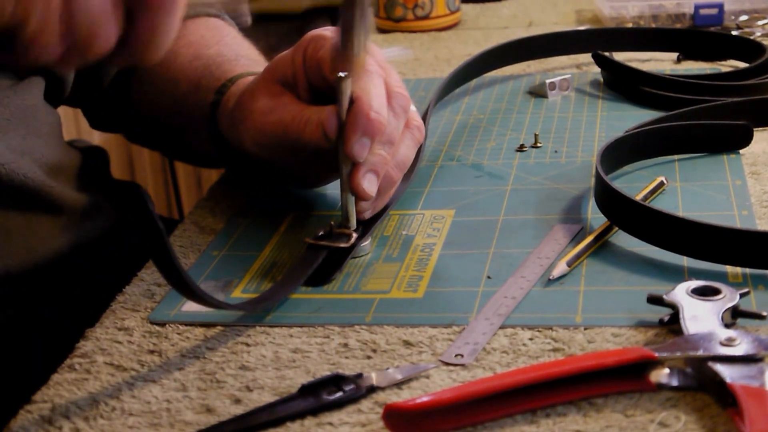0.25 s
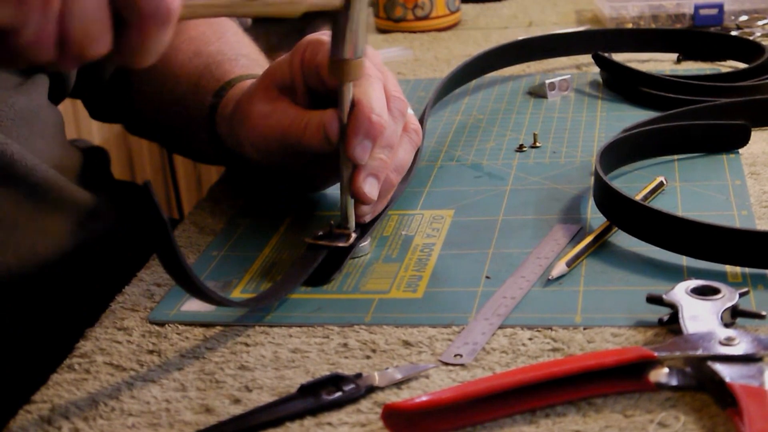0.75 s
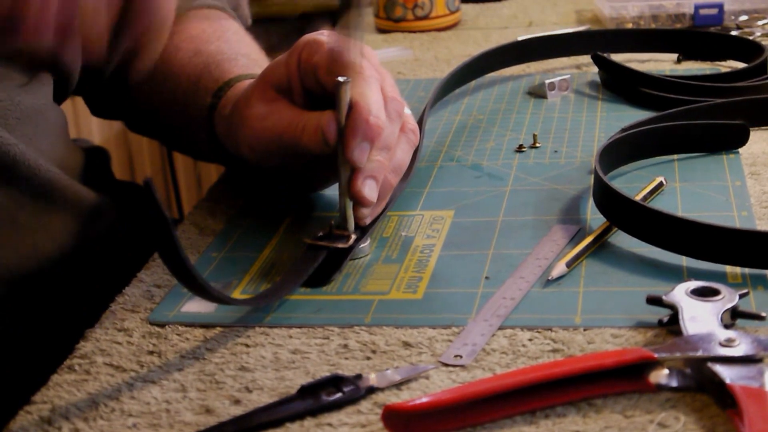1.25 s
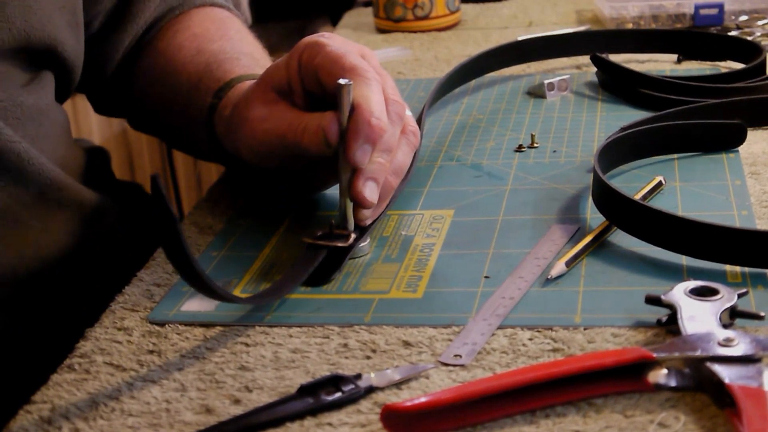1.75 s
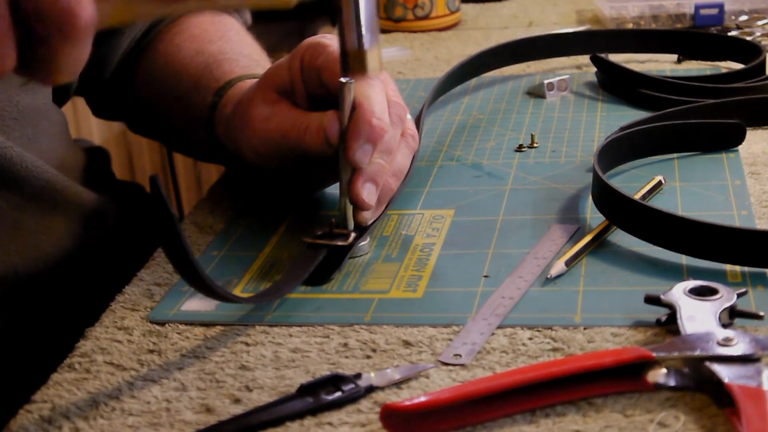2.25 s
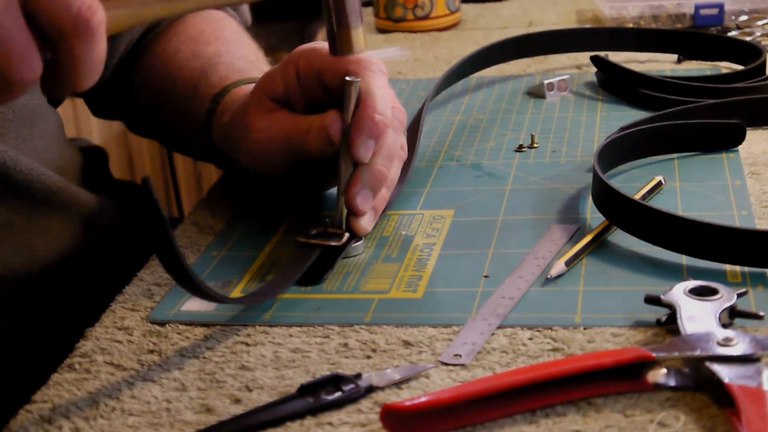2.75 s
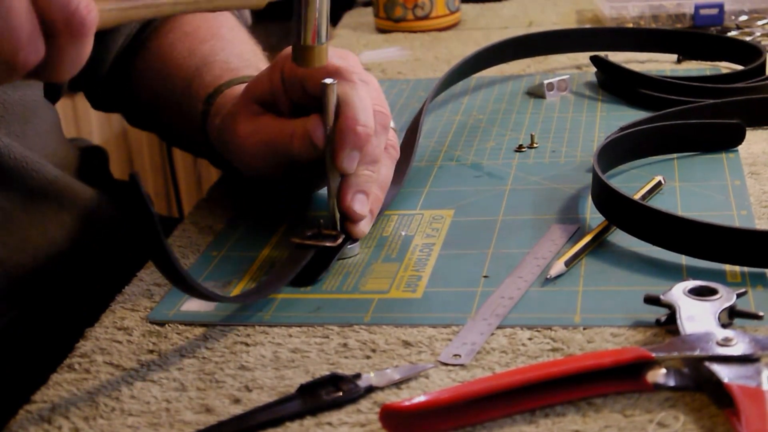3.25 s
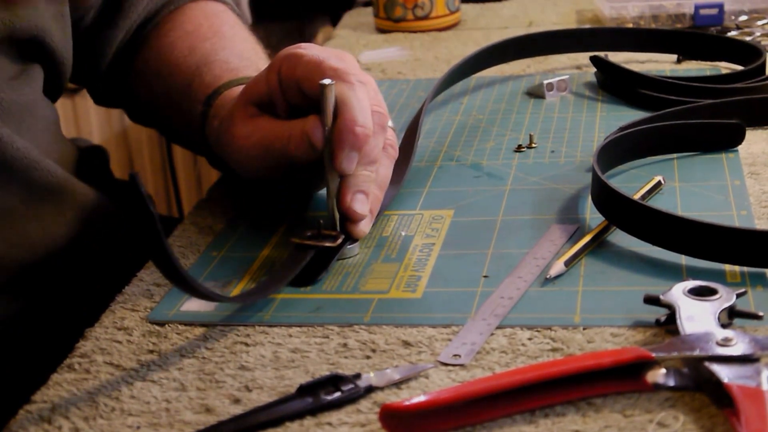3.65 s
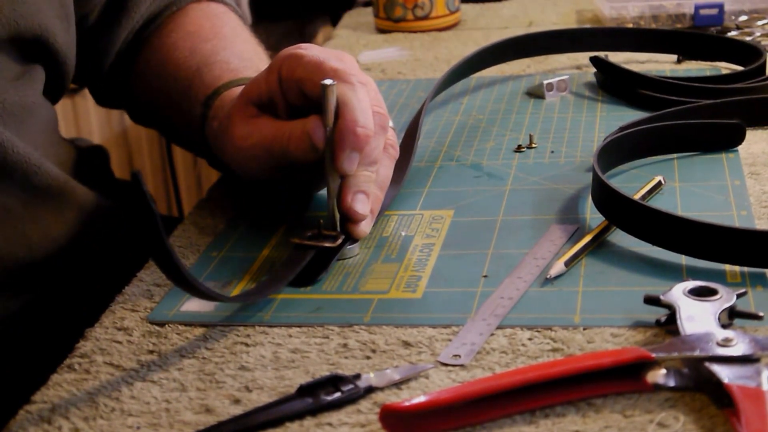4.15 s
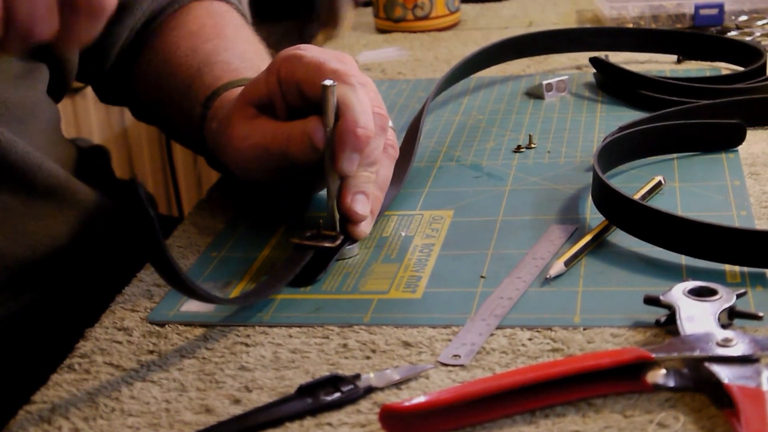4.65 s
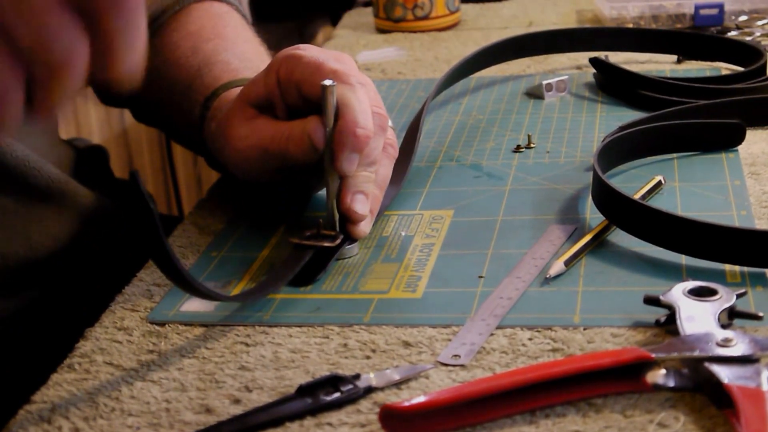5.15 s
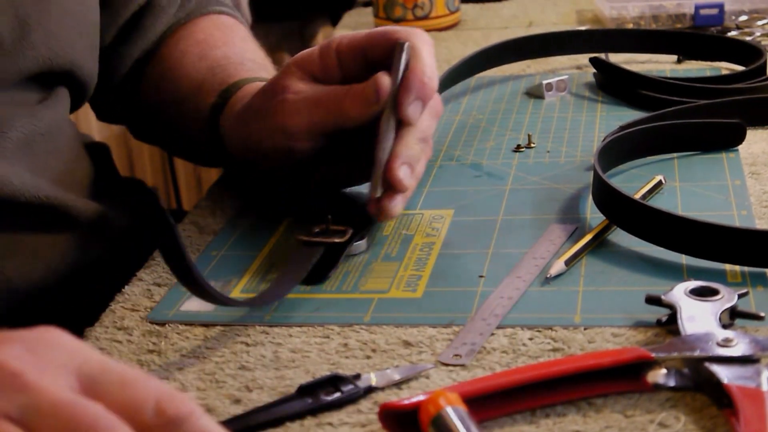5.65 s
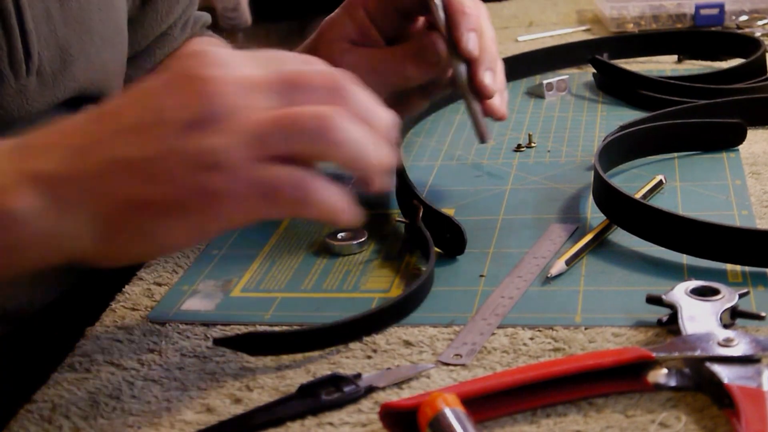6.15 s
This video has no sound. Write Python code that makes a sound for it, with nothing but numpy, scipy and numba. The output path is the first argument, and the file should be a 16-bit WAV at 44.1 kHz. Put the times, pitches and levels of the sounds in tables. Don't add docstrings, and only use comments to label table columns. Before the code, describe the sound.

A small hammer taps a steel rod in two runs of hard, ringing metallic knocks, then is set down with a leathery scrape and clatter.

```python
import sys
import numpy as np
from scipy import signal
from scipy.fft import rfft, irfft
from scipy.io import wavfile
from numba import njit

SR = 44100
rng = np.random.default_rng(int(sys.argv[2]) if len(sys.argv) > 2 else 0)


def boost(x):
    u = np.asarray(x, float) / 20
    return 10 ** u


def materialize(psi):
    bounded = np.clip(np.atleast_2d(psi).T, -1, 1)
    quanta = np.round(bounded * 32767).astype(np.int16)
    wavfile.write(sys.argv[1], SR, quanta)


N = 282240
SCATTER_DB, DETUNE = 1.3, 0.005
HISS_TOP_HZ = 8150


def add(out, s, x):
    i = int(s * SR)
    out[..., i:i + x.shape[-1]] += x[..., :N - i]


def ring(modes, seconds, push_s):
    hz, db, t60 = np.transpose(modes)[:, :, None]
    t = np.arange(int(seconds * SR)) / SR
    sign = (-1) ** np.arange(len(hz))[:, None]
    free = np.sum(sign * boost(db - 60 * t / t60) * np.sin(2 * np.pi * hz * t), axis=0)
    push = np.hanning(int(push_s * SR) + 3)
    return np.convolve(free, push / push.sum())[:len(t)]


def band(hz, ratio, size):
    sos = signal.butter(2, [hz / ratio, hz * ratio], "band", fs=SR, output="sos")
    x = signal.sosfilt(sos, rng.standard_normal((2, size)))
    return x / x.std()


def pair(mid_side, side_db):
    return mid_side[0] + boost(side_db) * mid_side[1] * np.array([[1], [-1]])


def tails(table, build_s, side_db, size):
    t = np.arange(size) / SR
    luck_db = 0.8 * rng.standard_normal(len(table))
    out = np.zeros((2, size))
    for (hz, db, t60, ratio), extra_db in zip(table, luck_db):
        envelope = boost(db + extra_db - 60 * t / t60) * (1 - np.exp(-t / build_s))
        noise = band(hz, max(ratio, 1.001), size)
        out += envelope * pair(noise, side_db + 0.001 * hz)
    return out


# t/s, strength/dB, crack level/dB, damping by the grip [1], rivet stage [0 loose - 4 firm]
BLOWS = [(0.1352, -3.5, -4, 1.6, -1), (.347, 1, -3.5, 1.4, 1.03), (0.5547, 2, -4.5, 1.4, 1.73),
         (0.7964, 3, -0.5, 1.5, 2), (1.0473, 4, -3, 1.2, 3), (1.316, 3, -1.5, 1.1, 3.5),
         (1.587, 3, 0, 1, 3.5), (1.854, 2.5, -1.5, 1.02, 3.5), (3.584, 1.5, -0.5, 1.1, 3),
         (3.9316, 2, -2.5, 1.1, 4.5), (4.275, 2.5, -5.5, 1.1, 4.5), (4.6228, 2.5, 0, 1.3, 4.5),
         (4.972, 2.5, -3, 1.1, 4)]


def hammer():
    out = np.zeros((2, N))
    for s, blow_db, crack_db, damp, stage in BLOWS:
        parts = (
            (-3, ring(rod_modes(stage, damp), 0.2, 0.00005)),
            (crack_db + 2.5, crack()),
            (4 * stage, seated_rivet()),
            (min(-3.5 + stage, -0.1), table_thud()),
            (-24, camera_shake()),
            (0, echoes()),
            (-3.5 * stage, rod_song()),
            (-0.5 * stage, table_rings()),
            (1.9 * stage, jars()),
            (0, buzz()),
            (3 * (stage - 5), hum()),
        )
        for db, part in parts:
            add(out, s, boost(blow_db + db) * part)
    return out


# f/Hz, width/Hz, level/dB
LOOSE_MODES = [(174, 25, 2), (300, 45, -12), (765, 70, 0), (1010, 90, -3), (1225, 73, -2), (1720, 70, -14),
               (2740, 70, -8), (3370, 60, -11), (4320, 65, -14), (4830, 50, -16), (5230, 60, -8),
               (5520, 66, -10), (5970, 70, -10), (6950, 100, -13)]
ROD_HZ = [345, 176, 772, 1110, 1230, 1525, 1800, 2180, 2680, 2920, 3230, 3830, 5200, 7200]
# width/Hz, level/dB when biting, level/dB when rolling, level/dB when firm
ROD_BALANCE = [(49.4, -8.5, -5.5, -17), (27, -5, -8.5, -16.5), (44, -4, -8, 5.5), (47, -10, -22, -2),
               (70, -1, -4.5, -24.5), (78.95, -3, -1.5, -21.5), (60, -23, -17.5, -16), (63, -12.5, 2, -9),
               (60, -21.5, -3, -10.5), (68.5, -21.5, -15.5, -10.5), (80, -14.5, -10.5, -7.5),
               (61, -22, -13, -4), (70, -5.5, -9.5, -19.5), (150, -16, -17.5, -24.5)]


def rod_modes(stage, damp):
    peaks = LOOSE_MODES
    if stage >= 0.5:
        peaks = [(hz, width, np.interp(stage, (1, 2, 4), db)) for hz, (width, *db) in zip(ROD_HZ, ROD_BALANCE)]
    modes = []
    for hz, width, db in peaks:
        detune, scatter = rng.standard_normal(2)
        level_db = db + SCATTER_DB * scatter + 20 * np.log10(width / 60)
        modes.append((hz * (1 + DETUNE * detune), level_db, 2.2 / (width * damp)))
    return modes


def crack():
    t = np.arange(400) / SR
    return boost(-60 * t / 0.0067) * pair(band(3700, 1.8, len(t)), -18)


def seated_rivet():
    return ring([(550, -31, 0.085), (1640, -35, 0.0053)], 0.1, 0.0001)


# f/Hz, level/dB, t60/s
THUD = [(44.73, -25.5, 0.0067), (69.4, -26.5, 0.088), (100, -13, 0.051), (168, -16, 0.045),
        (366, -12.5, 0.041), (510, -22.5, 0.042)]


def table_thud():
    return ring(THUD, 0.21, 0.00015)


def camera_shake():
    modes = [(38, 0, 0.039), (65, -3, 0.08), (150, -5, 0.08)]
    return ring(modes, 0.22, 0.0027) * np.array([[1], [0.2]])


# f/Hz, level/dB, t60/s, half width [frequency ratio]
ECHOES = [(190, -28, 0.2, 1.9), (378, -16, 0.04, 1.4), (703, -19, 0.11, 1.1), (1126, -21.5, .12, 1.25),
          (1900, -24.5, .13, 1.1), (2670, -19, 0.11, 1.2), (3900, -28.5, 0.15, 1.2),
          (5300, -27, 0.056, 0.42), (7050, -34.5, 0.11, 1.1)]


def echoes():
    return tails(ECHOES, 0.003, -35.5, size=9000)


# f/Hz, level/dB, t60/s, half width [frequency ratio]
ROD_SONG = [(5250, -26, .12, 1.05), (8000, -36, .12, 1.04), (2600, -33, .14, 1.09)]


def rod_song():
    return tails(ROD_SONG, 0.0015, -19.5, size=6000)


def settling():
    t = np.arange(SR // 2) / SR
    stop_db = -9 / (1 + np.exp((0.3 - t) / 0.01))
    return boost(stop_db - 60 * (2 * t) ** 6)


RING_HZ = [98, 109, 128, 170, 182, 222, 288, 302, 358, 468]
# level/dB, t60/s
RING_DECAY = [(-45, .7), (-41, 0.8), (-41, .7), (-38, 1.1), (-47, 1.1), (-49, 1.3), (-50, 0.8), (-50, 1.4),
              (-56, 1.1), (-58, .7)]


def table_rings():
    modes = []
    for hz, (db, t60) in zip(RING_HZ, RING_DECAY):
        scatter, detune = rng.standard_normal(2)
        modes.append((hz * (1 + DETUNE * detune), db + SCATTER_DB * scatter, t60))
    return settling() * ring(modes, 0.5, 0.0002)


# f/Hz, level/dB, t60/s
JARS = [(733, -48, 0.32), (1082, -58, .35), (1325, -71, 2.4)]


def jars():
    return ring(JARS, 0.79, 0.00005)


# f/Hz, level/dB, t60/s, half width [frequency ratio]
BUZZ = [(55, -47, .7, 1.4), (130, -50, .8, 1.4), (280, -55, .8, 1.4), (700, -57, .6, 1.25),
        (2450, -60, .9, 1.03)]


def buzz():
    return settling() * tails(BUZZ, 0.011, -27, size=SR // 2)


# f/Hz, level/dB, t60/s, half width [frequency ratio]
HUM = [(3850, -62, 1.5, 1.025), (4300, -59, 1.5, 1.06)]


def hum():
    return settling() * tails(HUM, 0.011, -27.5, size=SR // 2)


def handling():
    out = bumps() + ticks() + sliding_strap() + squeaks()
    return signal.sosfilt(signal.butter(6, HISS_TOP_HZ - 500, fs=SR, output="sos"), out)


# t/s, peak level/dB, f/Hz, t60/s
BUMPS = [(2.402, -54, 150, 0.2), (2.534, -41.5, 170, 0.039), (2.956, -41, 184, 0.057),
         (2.956, -47, 336, 0.11), (2.148, -52.5, 100, 0.39), (2.28, -53, 108, 0.38),
         (2.957, -40.5, 756, 0.045), (3.091, -50, 121, 0.054), (5.552, -32.5, 136, 0.14),
         (5.56, -42, 694, 0.048), (5.57, -34, 150, 0.079), (5.61, -37, 168, 0.074),
         (5.641, -40, 133, 0.061), (5.892, -29.5, 137.5, 0.13), (5.92, -49, 150.3, 0.37),
         (5.95, -41, 131, 0.073)]


def bumps():
    out = np.zeros((2, N))
    for s, db, hz, t60 in BUMPS:
        modes = [(hz, db, t60), (1.3 * hz, db - 9, 1.54 * t60), (2 * hz, db - 12.5, 0.47 * t60)]
        add(out, s, ring(modes, 0.2, 0.00103))
    return out


# t/s, peak level/dB, f/Hz, t60/s, click level/dB
TICKS = [(2.537, -50, 1190, 0.026, -1.5), (3.097, -49, 586, 0.046, -1), (5.578, -46, 3030, 0.0082, 7),
         (5.765, -50, 807, 0.072, -15), (5.78, -42, 1900, 0.023, -10), (5.801, -27.5, 690, 0.059, 17),
         (5.815, -33.5, 640, 0.03, -10), (5.837, -43, 1320, .03, 0), (5.84, -38, 1370, 0.064, -10),
         (5.866, -42.5, 1305, 0.097, 11), (5.886, -28, 774, 0.065, -17), (5.91, -35.5, 800, 0.067, -10),
         (5.968, -27, 826, 0.032, 15), (5.986, -35, 805, 0.049, 5), (6.057, -38.5, 795, 0.045, -8)]


def ticks():
    out = np.zeros((2, N))
    t = np.arange(2000) / SR
    for s, db, hz, t60, click_db in TICKS:
        modes = [(hz, db, 0.58 * t60), (1.6 * hz, db - 3.5, 0.15 * t60), (2.56 * hz, db - 9.5, 0.49 * t60)]
        add(out, s, ring(modes, 0.1, 0.0001))
        click = pair(band(2360, 1.6, len(t)), -40)
        add(out, s, boost(db + click_db - 26.5 - 60 * t / 0.031) * click)
        rattle = pair(band(1.3 * hz, 1.76, len(t)), -34)
        add(out, s, boost(db - 13.5 - 60 * t / (2.8 * t60)) * rattle)
    return out


# t/s, level/dB
SLIDE = [
    (5.7, -54.5),
    (5.81, -39),
    (5.85, -42),
    (5.87, -27),
    (5.885, -39),
    (5.982, -35.5),
    (6.0, -40),
    (6.05, -58),
    (6.199, -67),
]


def sliding_strap():
    out = np.zeros((2, N))
    s, slide_db = np.transpose(SLIDE)
    size = SR // 2
    t = s[0] + np.arange(size) / SR
    grains = boost(2.1 * rng.exponential(size=size))
    scrape = band(790, 1.13, size)
    scrape = scrape + boost(-7.5) * band(1700, 2.5, size)
    scrape = scrape + boost(-13) * band(4000, 1.9, size)
    add(out, s[0], boost(np.interp(t, s, slide_db) - 20.5) * grains * pair(scrape, -23))
    return out


# t/s, level/dB, f/Hz, length/s
SQUEAKS = [
    (2.0, -64, 5300, 0.025),
    (2.175, -63, 5300, 0.063),
    (2.212, -62, 5600, 0.039),
]


def squeaks():
    out = np.zeros((2, N))
    for s, db, hz, length_s in SQUEAKS:
        size = int(length_s * SR)
        noise = pair(band(hz, 1.015, size=4000), -18)[:, :size]
        add(out, s, boost(db) * np.hanning(size) * noise)
    return out


def dip(t, back_s):
    since = t - np.array(BLOWS)[:, :1]
    return np.tanh(np.sum((since > 0) * np.exp(-np.abs(since) / back_s), axis=0))


# f/Hz, level/dB
HISS = [(15, -7), (40, 3), (70, 1.5), (110, 1.5), (170, -6.5), (300, -9.5), (600, -7.5), (1300, -12),
        (2500, -6.5), (3300, -10), (4500, -16.5), (6300, -20), (8300, -27), (11000, -58.5)]
# f/Hz, side minus mid level/dB
HISS_SIDE = [(60, -9), (110, -3), (200, -10.5), (380, -12.5), (700, -20), (1290, -19), (2380, -30.5),
             (4400, -19.5), (8120, -3), (15000, 3)]
# t/s, level/dB
HISS_DRIFT = [
    (0, 2),
    (2.0, -1.2),
    (3.5, 0.37),
    (5.0, -2.5),
    (5.4, -5),
    (5.7, -1.7),
    (6.4, -.3),
]
# f/Hz, level/dB, half width [frequency ratio]
WHINE = [(2417, -22, 1.006), (2490, -19, 1.008), (2832, -22, 1.004), (3101, -28, 1.001), (6202, -31, 1.001)]


def hiss():
    t = np.arange(N) / SR
    hz = np.maximum(np.arange(N // 2 + 1) * SR / N, 1)
    curves = []
    for table in (HISS, HISS_SIDE):
        table_hz, table_db = np.transpose(table)
        curves.append(np.interp(np.log(hz), np.log(table_hz), table_db))
    colour, side = curves
    spectrum = rfft(rng.standard_normal((2, N))) * boost([colour, colour + side])
    spectrum = spectrum / (1 + (hz / HISS_TOP_HZ) ** 40)
    spectrum = spectrum / irfft(spectrum[0], N).std()

    blows = np.array([-9] + [row[0] for row in BLOWS])
    since = t - blows[np.searchsorted(blows, t) - 1]
    duck = np.exp(-(since / 0.3) ** 2)
    bite = np.minimum(0.3 + t / 1.1, 1)
    bass = 1 / (1 + (hz / 300) ** 4)
    treble = 1 / (1 + (4700 / hz) ** 16)
    parts = ((bass, -0.74), (1 - bass - treble, 0), (treble, -8.5 * duck * bite))
    out = sum(boost(db) * pair(irfft(spectrum * part, N), 0) for part, db in parts)

    whine_duck_db = -9 * duck
    for line_hz, db, ratio in WHINE:
        out = out + boost(db + whine_duck_db) * band(line_hz, ratio, N)[0]
    out = out + boost(-8.5 + whine_duck_db) * np.sin(2 * np.pi * 3101 * t)

    drift_db = np.interp(t, *np.transpose(HISS_DRIFT))
    level_db = -55.5 + drift_db + 1 * dip(t, 0.2) - 3.5 * dip(t, 2.2)
    pan_db = -1.7 * np.array([[0.5], [-0.5]])
    return out * boost(level_db + 3 + pan_db)


def scene():
    return hammer() + handling() + hiss()


def smear():
    out = np.zeros((2, N))
    block_s, block_start_s, lead_min_s = 1024 / SR, 0.0192, 0.0185
    for s, *_ in BLOWS:
        lead_s = lead_min_s + (s - lead_min_s - block_start_s) % block_s
        db = -44 - 380 * (lead_s - lead_min_s)
        t = np.arange(int((lead_s + 0.015) * SR)) / SR
        tilt = 0.5 - t / lead_s
        noise = boost(-8 * tilt) * band(1400, 4.5, size=2600)[:, :len(t)]
        noise = noise + boost(-2.5 - 3.5 * tilt) * band(5200, 1.7, size=2600)[:, :len(t)]
        add(out, s - lead_s, boost(db) * signal.windows.tukey(len(t), 0.3) * pair(noise, -10))
    return out


@njit
def follow(x, attack, release):
    y, e = np.empty(len(x)), 0.
    for i in range(len(x)):
        e += (x[i] - e) * (attack if x[i] > e else release)
        y[i] = e
    return y


def roll_off(x):
    return signal.sosfilt(signal.butter(12, 16460, fs=SR, output="sos"), x)


def record(dry):
    x = np.clip(dry, -1, 1)
    loud = np.roll(np.abs(x).max(axis=0), int(0.0061 * SR))
    quick = follow(loud, 0.0013, 1 / (0.035 * SR))
    slow = follow(loud, 0.013, 1 / (0.25 * SR))
    x = x * boost(-8 * quick - 10 * slow) + smear()
    cut = signal.firwin(201, 8800, window=("kaiser", 9), fs=SR)
    x = signal.fftconvolve(x, cut[None], "same", axes=1)
    return roll_off(np.clip(1.406 * x, -1, 1))


dry = scene()
out = record(dry)
materialize(out)
```